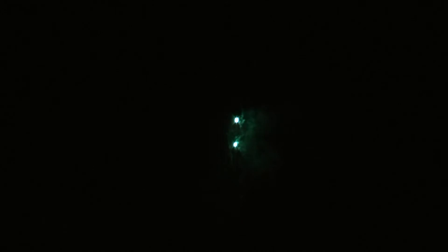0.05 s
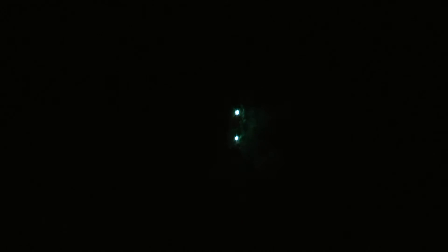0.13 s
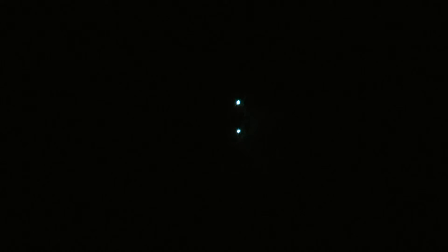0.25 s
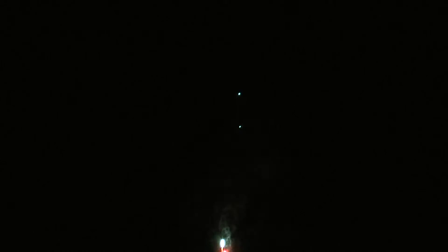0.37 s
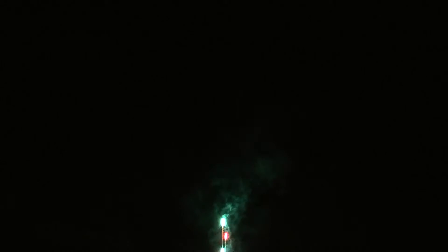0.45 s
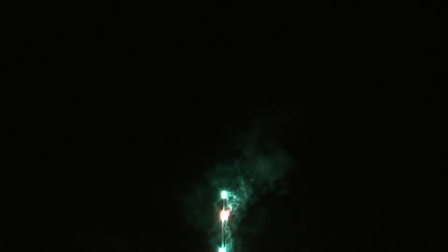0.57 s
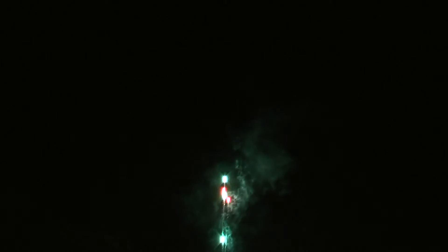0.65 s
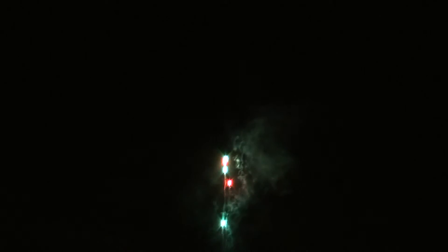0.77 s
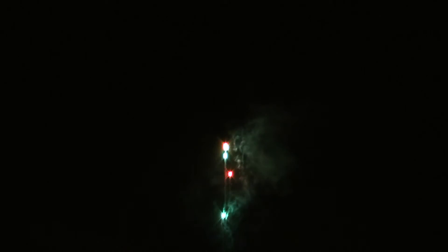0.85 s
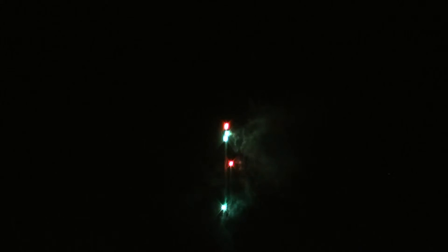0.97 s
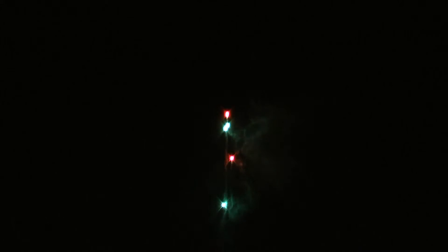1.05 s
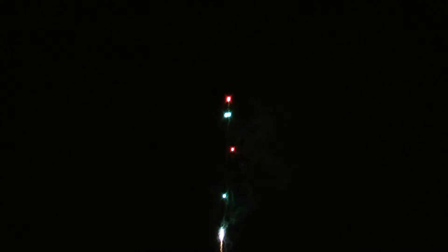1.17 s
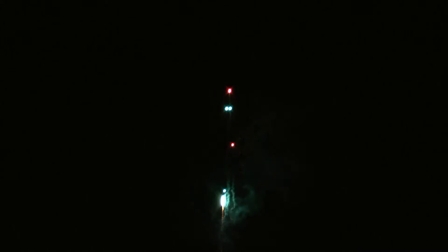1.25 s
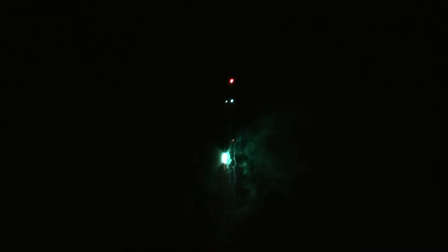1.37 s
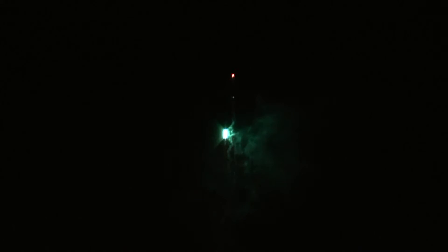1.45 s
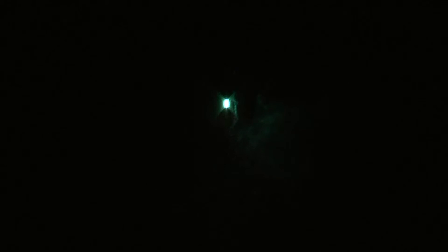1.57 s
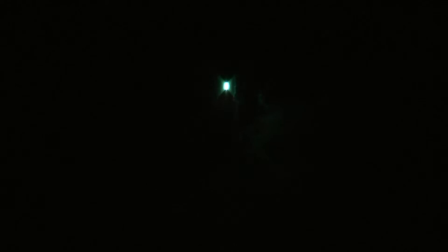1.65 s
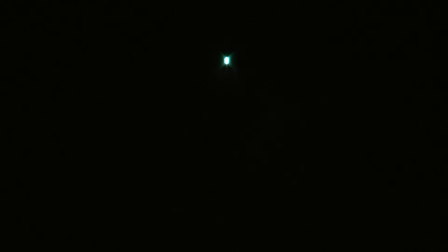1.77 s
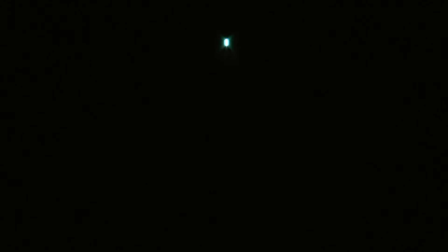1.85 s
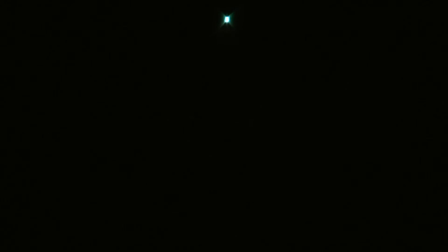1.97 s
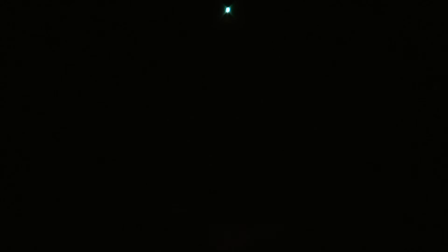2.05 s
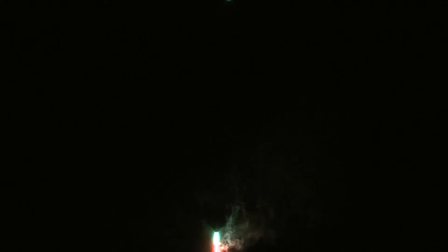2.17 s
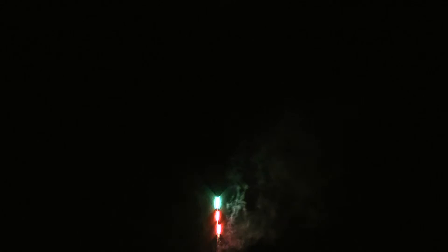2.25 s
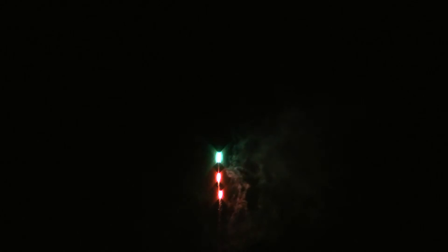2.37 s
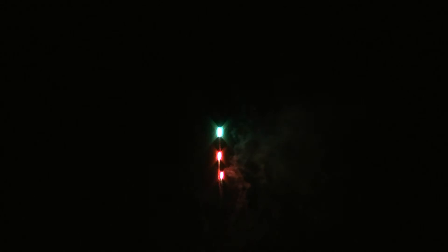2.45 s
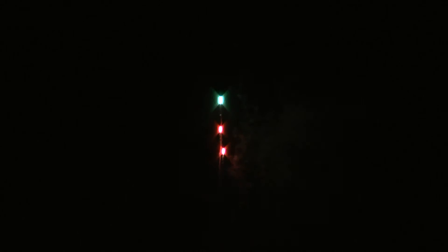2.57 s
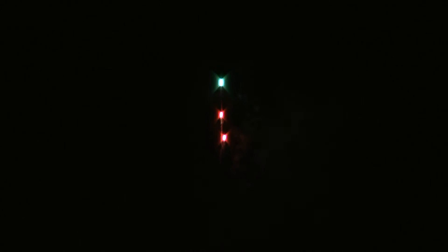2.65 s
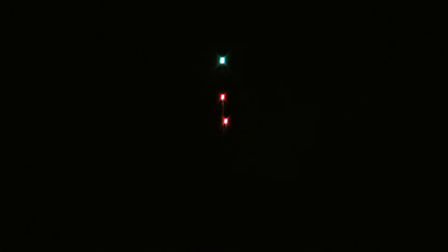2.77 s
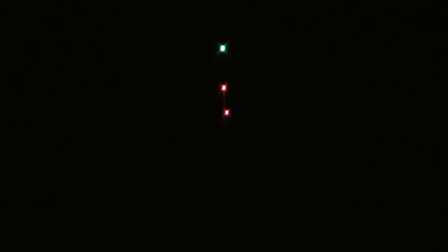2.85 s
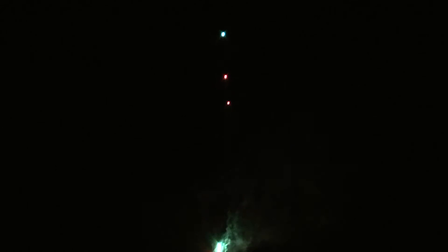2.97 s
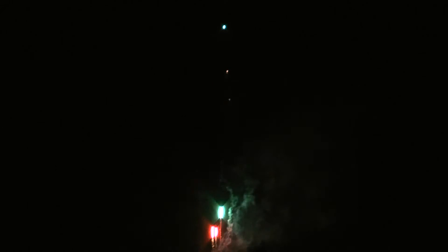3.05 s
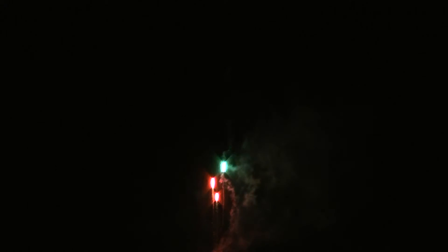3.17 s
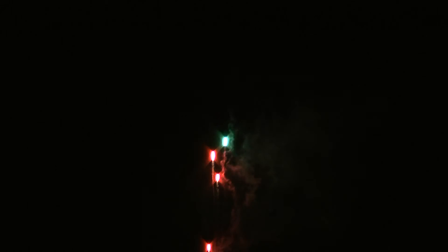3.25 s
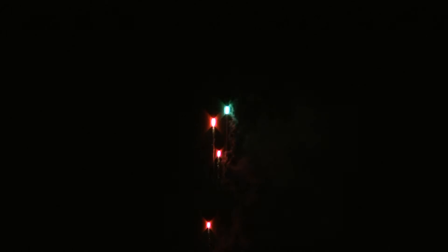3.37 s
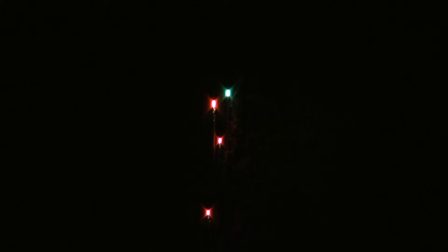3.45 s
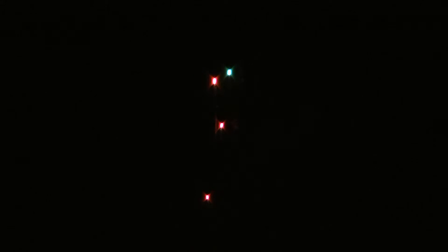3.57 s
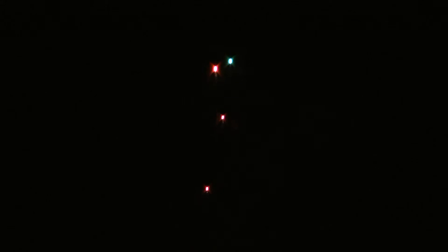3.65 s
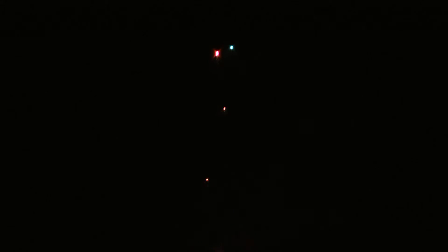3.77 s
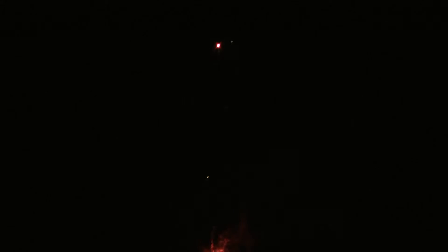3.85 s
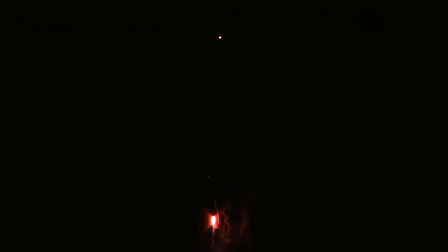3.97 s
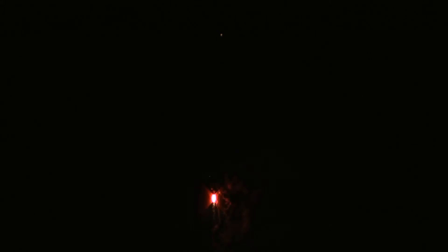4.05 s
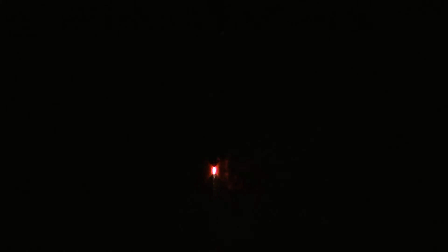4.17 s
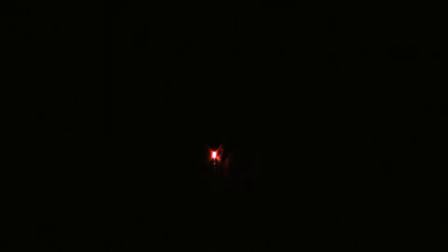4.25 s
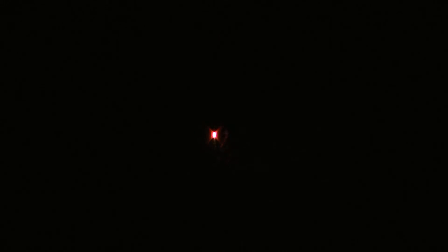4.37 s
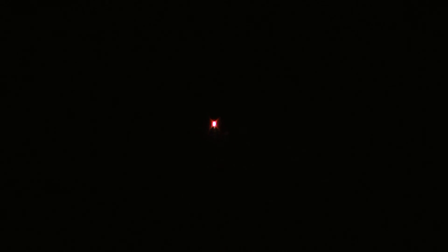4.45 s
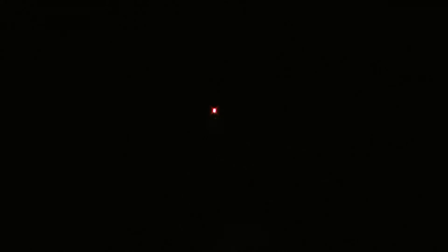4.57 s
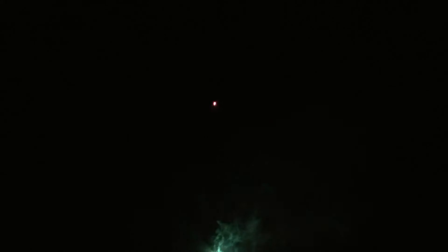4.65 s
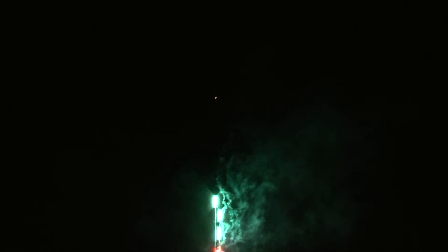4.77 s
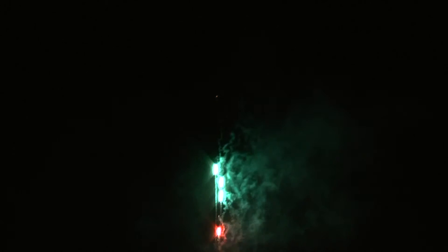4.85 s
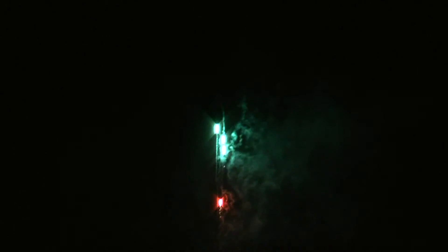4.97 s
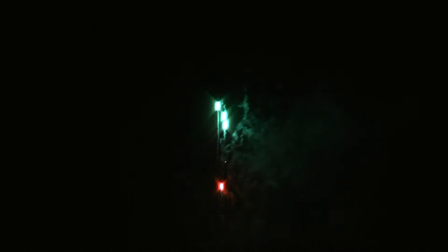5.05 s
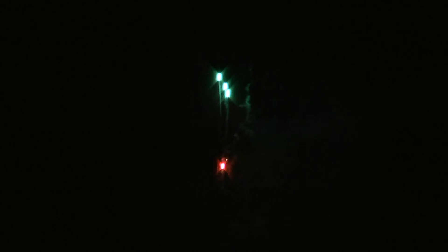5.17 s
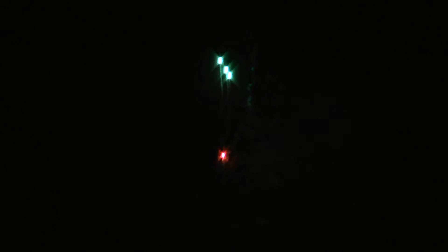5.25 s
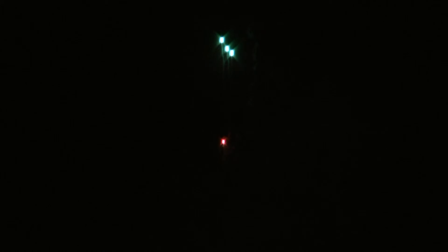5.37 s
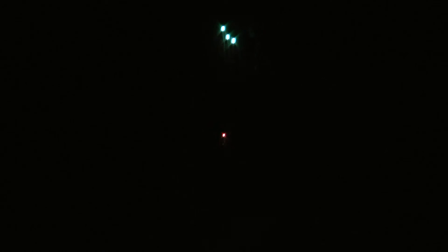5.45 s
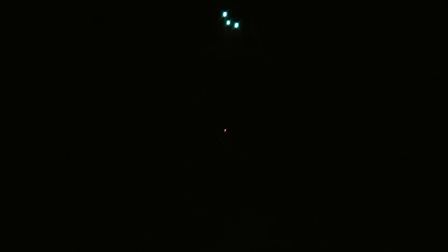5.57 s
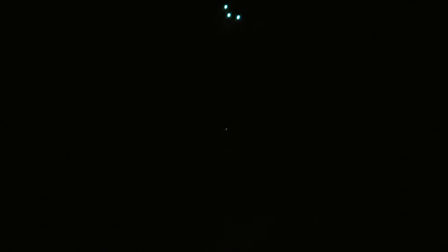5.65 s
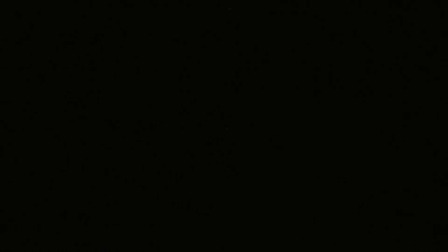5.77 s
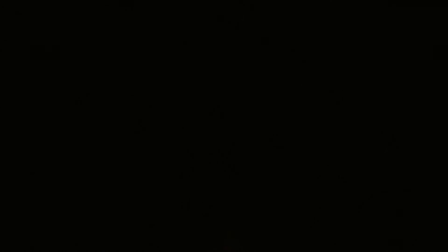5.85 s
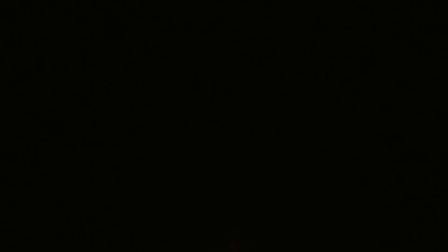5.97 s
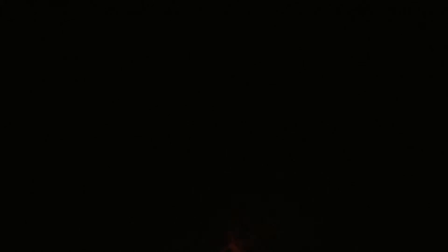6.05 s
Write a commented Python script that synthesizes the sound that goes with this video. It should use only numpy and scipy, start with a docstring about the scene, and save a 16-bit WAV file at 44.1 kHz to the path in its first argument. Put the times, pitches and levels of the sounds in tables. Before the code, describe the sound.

An open place at night, with faint steady murmur and hiss and the fading echo of an earlier firework shot. A close camera gives a short whirr and click at 0.3 s, again at 1.1 and 1.9 s. At 0.48 s a battery firework fires a stuttering run of five sharp bangs, the third weaker, until 0.65 s. A single hard crack follows at 1.3 s, three nearly merged at 2.2 s, three at 3.03 to 3.12 s, one at 3.9 s, a dense run of four at 4.75 to 4.85 s, and a much weaker pop at 5.5 s. Each is a dry double-edged snap with a brief hollow ring, then a long hissing wash of scattered echoes. Faint treble rustles pass nearby. Wind thumps the stereo microphone gently at first, stronger after 2.2 s, and heaviest from 5 to 5.9 s as low fluttering rumble, easing at 6 s.

```python
"""A battery firework fires runs of shots at night across open ground: each is a small puff of gas, a main blast,
a pull of air rushing back and a ringing tube. Trees and far walls send back a long hiss of scattered echoes.
Gusts of wind buffet the two microphone ports with low, filtered noise, over a steady murmur and hiss.
A still camera close by whirrs and clicks three times (noise through resonances), among faint treble rustles."""
import sys
import numpy as np
from scipy import signal
from scipy.fft import rfft, irfft
from scipy.io import wavfile
from scipy.ndimage import uniform_filter1d

SR = 44100
rng = np.random.default_rng(int(sys.argv[2]) if len(sys.argv) > 2 else 0)


def generate_wav(signal):
    """Clip the signal to [-1, 1] and save it as 16-bit WAV at the path in sys.argv[1]."""
    frames = np.transpose(np.atleast_2d(signal))
    scaled = np.clip(frames, -1, 1) * 32767
    pcm = np.round(scaled).astype(np.int16)
    wavfile.write(sys.argv[1], SR, pcm)


N = 269892  # length [samples]
LEAD_IN = SR  # extra second in front, so that an earlier shot can still echo [samples]


def undb(db):
    """Turn decibels into a factor of amplitude."""
    return 10 ** (np.asarray(db) / 20)


def unit(x):
    """Scale a sound to an average (RMS) strength of 1."""
    return x / np.sqrt(np.mean(x ** 2))


def fade(t, t60):
    """Silent before zero, then dying away by 60 dB in each t60."""
    return (t >= 0) * np.exp(-np.log(1000) * np.abs(t) / t60)


def ring(x, modes):
    """Add up the resonances (frequency [Hz], width [Hz], level [dB]) that x sets ringing."""
    total = 0
    for hz, width, db, *_ in modes:
        b, a = signal.iirpeak(hz, hz / width, fs=SR)
        total = total + undb(db) * signal.lfilter(b, a, x)
    return total


def pair(likeness, size):
    """Left and right noise: 1 makes them the same, 0 unrelated, -1 opposite."""
    mid, side = rng.standard_normal((2, size))
    c = np.clip(likeness, -1, 1)
    return np.sqrt((1 + c) / 2) * mid + np.sqrt((1 - c) / 2) * side * np.array([[1], [-1]])


def walk(rate, size):
    """Wander smoothly between random levels, rate of them per second, with a spread of 1."""
    k = int(SR / rate)
    steps = np.repeat(rng.standard_normal(size // k + 1), k)
    smooth = uniform_filter1d(uniform_filter1d(steps, k), k)
    return unit(smooth[:size])


def left_right(pan_db):
    """Gains of the two channels for a level of left minus right [dB]."""
    return undb(np.array([pan_db, -pan_db]) / 2)


# colour of the night murmur and hiss: (frequency [Hz], relative level [dB per Hz])
NIGHT_COLOUR = [(150, -41), (250, -10), (723, 1), (1820, -13.5), (2160, -2.5), (3280, -15.5), (4570, -16.5),
                (8550, -25.5), (14900, -25.5), (16000, -34)]
NIGHT_DB, NIGHT_LIKENESS = -52, 0.94  # overall level [dB]; left-right likeness


def night():
    """A steady far murmur of air and the hiss of the microphone: noise shaped in frequency."""
    hz, db = np.transpose(NIGHT_COLOUR)
    bins = np.fft.rfftfreq(N, 1 / SR) + 1
    colour = np.interp(np.log(bins), np.log(hz), db)
    return undb(NIGHT_DB) * unit(irfft(rfft(pair(NIGHT_LIKENESS, N)) * undb(colour), N))


EVEN_S, EVEN_SHARE = 0.043, 0.86  # smoothing time, used twice [s]; how far chance swells are flattened, 0 to 1


def even(x):
    """Press the chance swells of both channels nearly flat, so gusts and eddies set the strength."""
    k = int(EVEN_S * SR)
    power = uniform_filter1d(uniform_filter1d(np.mean(x ** 2, axis=0), k), k)
    return unit(x / (power + 1e-9) ** (EVEN_SHARE / 2))


# strength of the lower wind rumble at the ports, before the buffets: (time [s], level [dB])
WIND_STRENGTH = [(0, -51), (.45, -52.5), (.66, -38.5), (.85, -52.5), (1.2, -45.5), (1.8, -38.5),
                 (2.15, -42), (2.6, -39.5), (3.1, -30), (3.4, -39), (3.65, -57), (3.9, -37), (4.3, -40),
                 (4.5, -25.5), (4.9, -29), (5.2, -22), (5.55, -19), (5.8, -17.5), (6.12, -31.5)]
# single eddies that stand out of the wind:
# (middle time [s], length [s], lower thump level [dB], upper rumble level [dB])
WIND_EDDIES = [(0.348, 0.069, -43, -58), (1.178, .06, -36, -50), (2.224, .06, -26.5, -39),
               (2.633, 0.093, -25.5, -41), (2.792, 0.13, -31, -26), (2.877, 0.097, -26.5, -22),
               (2.958, 0.037, -30, -30), (2.988, 0.018, -36, -31), (3.21, 0.027, -24, -24),
               (3.273, 0.021, -25, -29), (3.877, 0.055, -28, -27), (4.088, 0.17, -28.5, -29.5),
               (4.327, 0.067, -33.5, -40), (4.438, 0.073, -26, -24.5), (4.62, 0.29, -22.5, -26.5),
               (5.063, 0.066, -13.5, -17.5), (5.135, 0.067, -20.5, -23), (5.291, 0.14, -17, -19),
               (5.523, 0.13, -13.5, -22), (5.609, .05, -26, -8.5), (5.653, 0.057, -22, -7.5),
               (5.708, 0.049, -12.5, -9), (5.758, 0.14, -16, -8.5), (5.876, 0.059, -20.5, -7),
               (5.953, 0.11, -24.5, -16), (6.098, 0.042, -24.5, -15)]
# bands of the lower and of the upper rumble, likeness limited to -1 to 1:
# (frequency [Hz], width [Hz], relative level [dB], left-right likeness)
LOW_BANDS = [(34.3, 7, -4, 0.14), (61, 3.7, -4.5, 0.38), (76.6, 11, -5, 0.18), (107.2, 10.8, -8, 0.31)]
HIGH_BANDS = [(107.8, 15, 1.5, -0.81), (131.8, 14, 5, -0.84), (178.6, 15.4, -4, -0.83),
              (231, 44, -19.5, -2)]
UPPER_DB, UPPER_PER_DB = -8.5, 0.63  # upper rumble against the lower at -35 dB; its change per dB of wind
PAN_DB, PAN_WANDER_DB = -1, 2.5  # left minus right and its spread [dB]
BUFFET_DB = 3  # spread of the quick buffets [dB]
STOP = .5  # farthest the wind can push a diaphragm [amplitude]


def wind():
    """Eddies thump the ports in quick buffets; the upper rumble reaches them in opposite sense."""
    t = np.arange(N) / SR
    db = np.interp(t, *np.transpose(WIND_STRENGTH))
    lower = undb(db)
    upper = undb(db + UPPER_DB + UPPER_PER_DB * (db + 35))
    for s, length, lower_db, upper_db in WIND_EDDIES:
        swell = np.cos(np.pi * np.clip((t - s) / length, -.5, .5)) ** 2
        lower = np.maximum(lower, undb(lower_db) * swell)
        upper = np.maximum(upper, undb(upper_db) * swell)

    low = unit(sum(ring(pair(band[3], N), [band]) for band in LOW_BANDS))
    high = unit(sum(ring(pair(band[3], N), [band]) for band in HIGH_BANDS))
    steep = signal.butter(3, [30, 280], "band", fs=SR, output="sos")
    rumble = lower * even(signal.sosfilt(steep, low)) + upper * even(signal.sosfilt(steep, high))

    pan_db = PAN_DB + PAN_WANDER_DB * walk(12, N)
    buffets = undb(BUFFET_DB * walk(21.977, N))
    rumble = rumble * buffets * left_right(pan_db)
    # the hardest buffets drive the diaphragms to their stop
    return np.clip(rumble, -STOP, STOP)


# faint treble rustles close by: (start time [s], peak level [dB])
RUSTLE_TIMES = [(.05, -63), (.77, -60), (1.531, -60), (2.08, -73), (4.45, -62)]
RUSTLE_S = 0.048  # length of each [s]


def rustles():
    """Brief soft swells of high hiss: noise in two broad treble bands."""
    t = np.arange(N) / SR
    swell = 0
    for s, db in RUSTLE_TIMES:
        swell = swell + undb(db) * np.sin(np.pi * np.clip((t - s) / RUSTLE_S, 0, 1))
    return swell * unit(ring(rng.standard_normal(N), [(8000, 5000, 0), (13000, 4000, -1)]))


# camera whirrs, and the click that ends each: (start time [s], level [dB])
WHIRR_TIMES = [(0.303, -46.5), (1.061, -45), (1.9037, -44)]
CLICK_TIMES = [(0.3426, -39), (1.1005, -39), (1.9485, -37.5)]
# resonances of the camera in the whirr and in the click: (frequency [Hz], width [Hz], relative level [dB])
WHIRR_MODES = [(4670, 1700, 17.5), (6540, 400, 8), (8600, 820, 8), (10000, 1600, -14), (14000, 1500, -9)]
CLICK_MODES = [(3460, 1600, 3), (5150, 76, 0), (6300, 55, 6), (9500, 750, -6), (12000, 330, -20),
               (14100, 270, -15)]
WHIRR_T60_S, CLICK_T60_S = 0.21, 0.0089  # times to die away by 60 dB [s]
AFTER_DB, AFTER_T60_S = -2.5, 0.032  # slower shiver against the click [dB], and its time to die away [s]


def camera():
    """A small drive buzzes its housing, then the shutter snaps and shivers out."""
    t = np.arange(N) / SR
    whirr, click = 0, 0
    for (s, db), (end, _) in zip(WHIRR_TIMES, CLICK_TIMES):
        attack = np.clip((t - s) / 0.0034, 0, 1)
        running = t < end + .02  # stops 20 ms after its click begins
        whirr = whirr + undb(db) * fade(t - s, WHIRR_T60_S) * attack * running
    for s, db in CLICK_TIMES:
        shiver = undb(AFTER_DB) * fade(t - s, AFTER_T60_S)
        click = click + undb(db) * (fade(t - s, CLICK_T60_S) + shiver)
    noise = rng.standard_normal((2, N))
    return whirr * unit(ring(noise[0], WHIRR_MODES)) + click * unit(ring(noise[1], CLICK_MODES))


PATTERNS = 4  # separate random echo patterns, taken in turn by the shots
NEAR_DB, NEAR_T60_S = -8.5, 0.64  # nearest returns: level against the rest [dB], time to die away by 60 dB [s]
PATCHY_DB = 1  # spread of the uneven patches [dB]
# how the surroundings answer: (frequency [Hz], level [dB], time to die away by 60 dB [s],
#     build-up [ms], left-right likeness, left minus right [dB])
SURROUNDINGS = [(216, -48.5, 2.46, 5.8, 0.78, 1.5), (430, -48, 3.32, 3.7, 0.7, -1.5),
                (814, -41, 3.77, 2.4, 0.36, 0), (1200, -35.5, 4.23, 8.4, 0.53, 1.5),
                (2270, -29, 3.08, 4.4, 0.75, 1), (4040, -25, 2.06, 22, 0.83, 1.2),
                (6500, -28, 1.59, 16, 0.76, 0.2), (9300, -31, 0.49, 86, 1, 0), (14700, -47, 0.7, 97, 1, 1)]


def echoes(outward):
    """Countless scattered returns: each half octave builds up, then dies at its own pace in uneven patches."""
    hz, *columns = np.transpose(SURROUNDINGS)
    t = np.arange(int(2.5 * SR)) / SR
    out = 0
    for sent in outward:
        response = 0
        for f in 100 * 2 ** np.arange(0, 7.5, .5):
            db, t60, rise, like, pan_db = (np.interp(np.log(f), np.log(hz), c) for c in columns)
            near = undb(NEAR_DB) * np.clip(t / 0.002, 0, 1) * fade(t, NEAR_T60_S)
            far = (1 - np.exp(-t * 1000 / rise)) * fade(t, t60)
            shape = (far + near) * undb(PATCHY_DB * walk(13.9, len(t)))
            band = signal.butter(2, [f / 2 ** .25, f * 2 ** .25], "band", fs=SR, output="sos")
            gain = undb(db) * left_right(pan_db)[:, None]
            response = response + gain * shape * signal.sosfilt(band, pair(like, len(t)))
        # every sound sent out starts the whole train of returns
        out = out + signal.fftconvolve(sent[None], response, axes=1)[:, :len(sent)]
    return out


def front(ms, rise):
    """A shock front: pressure steps smoothly from 0 to 1 around time zero (both in ms)."""
    return (1 + np.tanh(ms / rise)) / 2


RISE_MS, PUFF_SHARE = 0.029, .8  # rise of a shock front [ms]; the puff is shorter than the main blast


def pulses(ms, lag, puff_db, lasts):
    """The leading puff jumps up and sinks; lag ms later the main blast pushes and falls to zero."""
    age = np.maximum(ms + lag, 0) / (PUFF_SHARE * lasts)
    puff = front(ms + lag, RISE_MS) * np.cos(np.pi / 2 * age) * np.exp(-.55 * age)
    main = front(ms, RISE_MS) * (1 - np.clip(ms / lasts, 0, 1) ** 1.1)
    return undb(puff_db) * puff + main


# bounce off the ground: delay [ms], level [dB]
BOUNCE_MS, BOUNCE_DB = 0.33, -7.5
# pull of the air rushing back: level at 0.5 ms of overpressure [dB]; a longer push pulls back harder [dB per ms]
SUCTION_DB, SUCTION_DB_PER_MS = -2.52, 10
# rebound: time after the main blast [ms], rise [ms], level [dB], further change on its way to the echoes [dB]
REBOUND_MS, REBOUND_RISE_MS, REBOUND_DB, REBOUND_SENT_DB = 1.71, 0.42, -6, -19.5
RING_T60_MS, RATTLE_T60_MS, RATTLE_DB = 9, 29.4, -13.5  # tube ring and block rattle
ROUGH_DB, ROUGH_T60_MS = -22, 7.5  # short noise burst in the sound sent to the echoes
AIR_HZ, SHOT_PAN_DB = 4900, 1.5  # treble limit of the direct sound [Hz]; left minus right [dB]
# resonances of the block of tubes: (frequency [Hz], width [Hz], relative level [dB])
BLOCK_MODES = [(1200, 2100, -68), (2260, 560, -16.5), (4830, 900, -24)]
# the shots: (time of the leading puff [s], main blast level [dB], puff level against it [dB],
#     main blast after the puff [ms], overpressure lasts [ms], tube ring [Hz], echo level [dB], echo treble [dB])
FIREWORK_SHOTS = [(-0.4, -7, -6.5, 1.24, 0.33, 790, -3, -5.5), (0.48, -10.5, -1, 1.82, 0.2, 450, -2, -8),
                  (0.5606, -21.5, 5, 3.18, .5, 860, -6, -1.5),
                  (0.6184, -8, -3.5, 1.46, 0.52, 790, -5.5, -2),
                  (0.6536, -6, -7.5, 1.16, 0.55, 870, -3.5, -2.5),
                  (1.3107, -3.5, -11, 0.87, 0.57, 980, -4, -2.5),
                  (2.2104, -8, -5.5, 1.96, 0.46, 517, -2.5, -8),
                  (2.2334, -7, -5, 0.98, 0.5, 980, -6.5, 0.5), (2.245, -6.5, -4, 1.17, 0.59, 740, -6.5, 0),
                  (3.0306, -8, -3, 1.38, 0.51, 470, -6, -2),
                  (3.0664, -2.5, -6.5, 1.173, 0.45, 740, -4.5, -2),
                  (3.1164, -3.5, -3.5, 1.09, 0.68, 765, -7.5, -2.5),
                  (3.893, -8.5, -6, 1.386, 0.694, 450, -5.5, -2),
                  (4.7537, -13.5, -17, 1.36, 0.86, 430, 2.5, -4),
                  (4.7717, -4, -5.5, 0.96, 0.67, 630, -7, -3.5),
                  (4.8006, -4.5, -3, 0.93, 0.68, 514, -1.5, -7),
                  (4.8519, -4.5, -1.5, 1.2, 0.82, 620, -9, 2.5),
                  (5.518, -21.5, 2, 4.5, 0.69, 500, 4.5, -9.5)]


def shots():
    """Gas puffs past the star, the main blast follows, air rushes back in and rebounds; tube and block ring on."""
    direct, outward = np.zeros(N + LEAD_IN), np.zeros((PATTERNS, N + LEAD_IN))
    span = np.arange(SR // 20)
    noise = rng.standard_normal((len(FIREWORK_SHOTS), len(span)))
    for k, (s, db, puff_db, lag, lasts, hz, echo_db, treble_db) in enumerate(FIREWORK_SHOTS):
        at = int(s * SR) + LEAD_IN - 44  # start 1 ms early to hold the rise of the front
        ms = ((at + span - LEAD_IN) / SR - s) * 1000 - lag  # time since the main blast

        # the ground returns each front a moment later, overlapping the blast
        short = max(lasts - .6 * BOUNCE_MS, .26)
        bounce = undb(BOUNCE_DB) * pulses(ms - BOUNCE_MS, lag, puff_db, short)
        push = pulses(ms, lag, puff_db, short) + bounce
        suck_db = SUCTION_DB + SUCTION_DB_PER_MS * (lasts - .5)
        pull = np.sin(np.pi * np.clip((ms - lasts) / (REBOUND_MS - lasts), 0, 1) ** 0.67)
        suction = undb(suck_db) * pull
        blast = undb(db) * (push - suction)

        after = np.maximum(ms - REBOUND_MS, 0)
        tube = np.cos(2 * np.pi * hz * after / 1000) * fade(after, RING_T60_MS)
        rebound = undb(db + REBOUND_DB) * front(ms - REBOUND_MS, REBOUND_RISE_MS) * tube
        body = unit(ring(noise[k], BLOCK_MODES + [(hz, 300, 0)]))
        rattle = body * front(ms - REBOUND_MS, 1.0) * fade(after, RATTLE_T60_MS)
        direct[at + span] += blast + rebound + undb(db + RATTLE_DB) * rattle

        # the echoes are fed the blast without its ground bounce
        wave = undb(db) * (pulses(ms, lag, puff_db, lasts) - suction) + undb(REBOUND_SENT_DB) * rebound
        # a short burst of noise roughens each blast as sent to the echoes
        wave = wave + undb(db + ROUGH_DB) * noise[k, ::-1] * fade(ms, ROUGH_T60_MS)
        low = signal.lfilter(*signal.butter(2, 1500, fs=SR), wave)
        treble = undb(treble_db) * (wave - low)
        outward[k % PATTERNS, at + span] += undb(echo_db) * (low + treble)
    return signal.lfilter(*signal.butter(2, AIR_HZ, fs=SR), direct), outward


def scene():
    """Add up the night, wind, rustles, camera, and the shots with their echoes."""
    direct, outward = shots()
    firework = direct * left_right(SHOT_PAN_DB)[:, None] + echoes(outward)
    return night() + wind() + rustles() + camera() + firework[:, LEAD_IN:]


OVERLOAD, LOW_CUT_HZ, TOP_HZ = .8, 40, 15800  # limit of the ports [amplitude]; bass and top cuts [Hz]


def record(dry):
    """The ports overload on the loudest peaks; the deepest bass and the top are cut."""
    soft = dry / (1 + (dry / OVERLOAD) ** 4) ** (1 / 4)
    soft = signal.sosfilt(signal.butter(1, LOW_CUT_HZ, "high", fs=SR, output="sos"), soft)
    return signal.sosfilt(signal.ellip(10, .2, 70, TOP_HZ, fs=SR, output="sos"), soft)


dry = scene()
out = record(dry)
generate_wav(out)
```